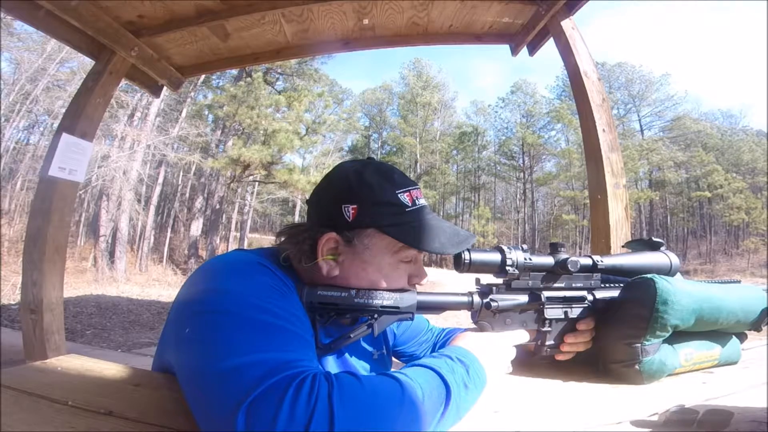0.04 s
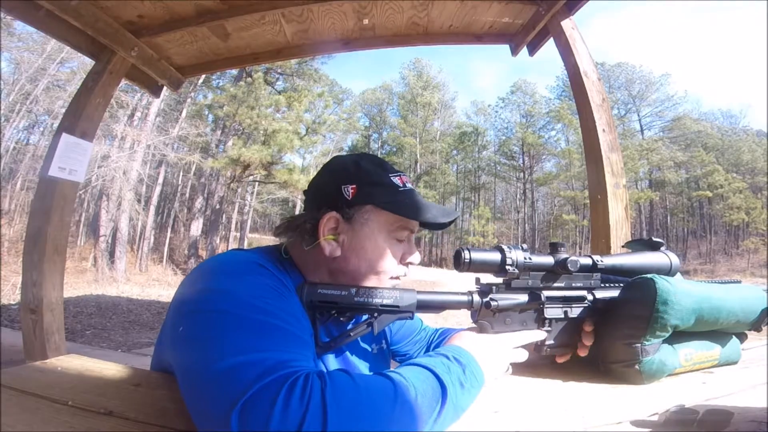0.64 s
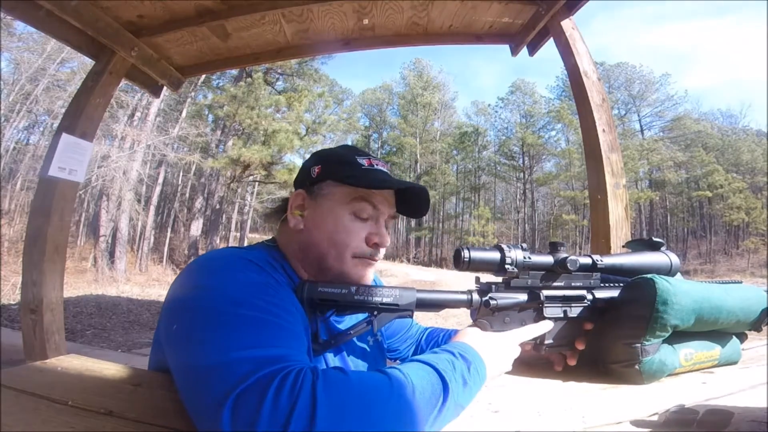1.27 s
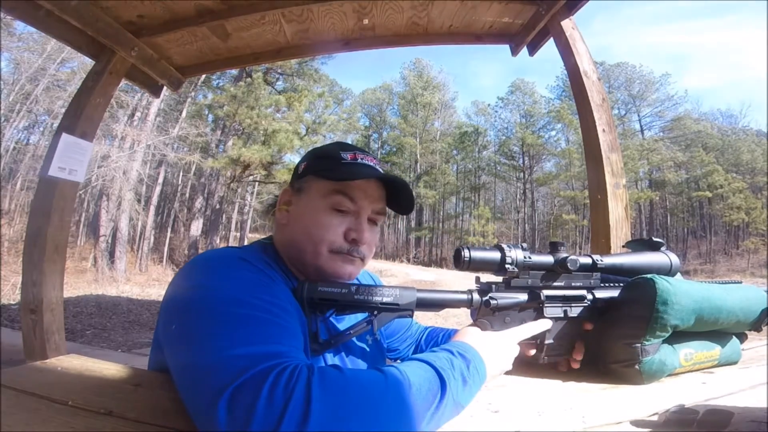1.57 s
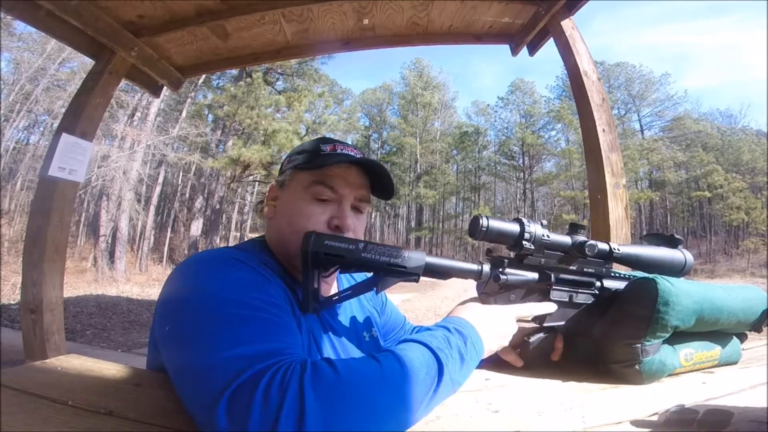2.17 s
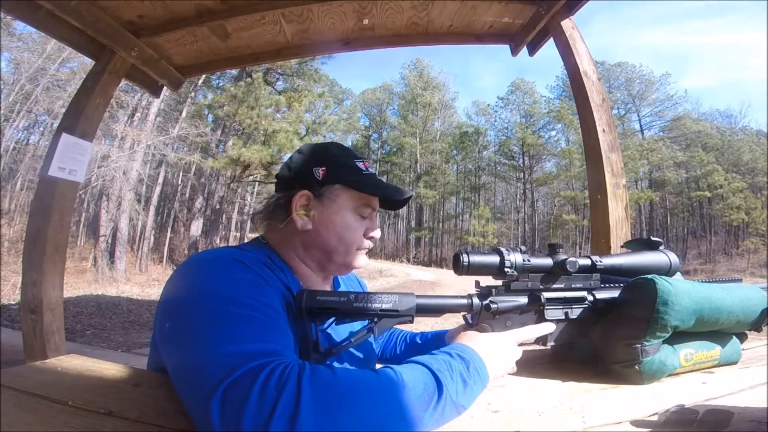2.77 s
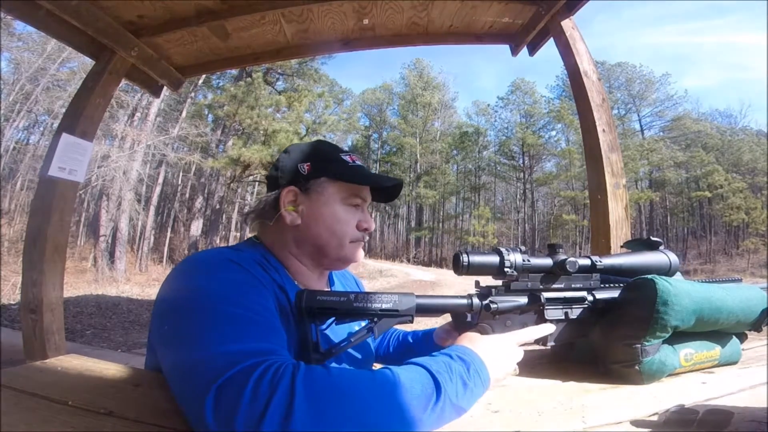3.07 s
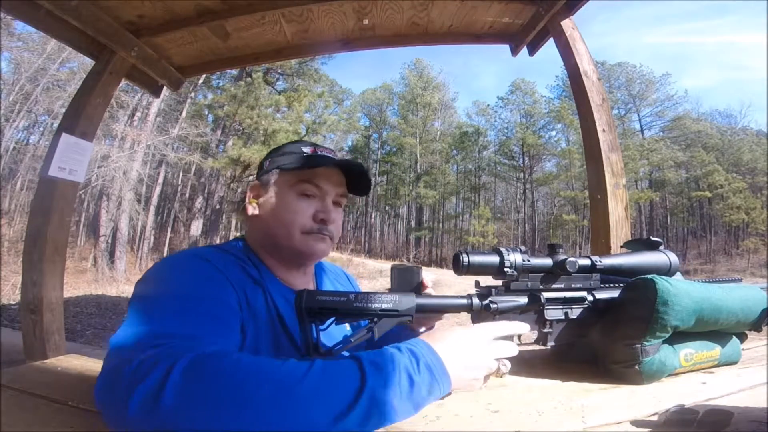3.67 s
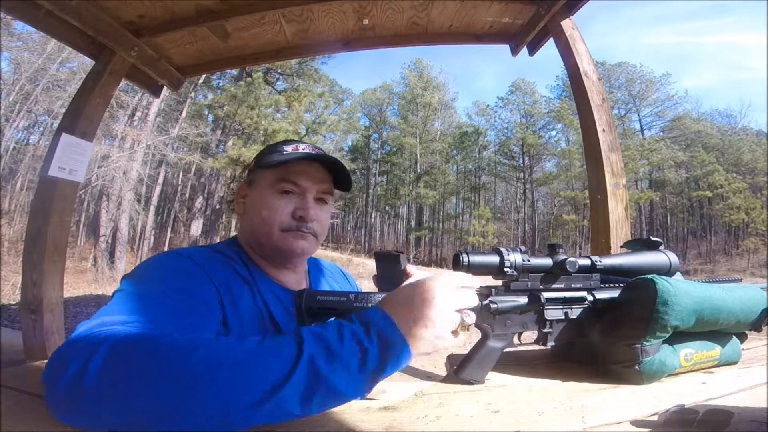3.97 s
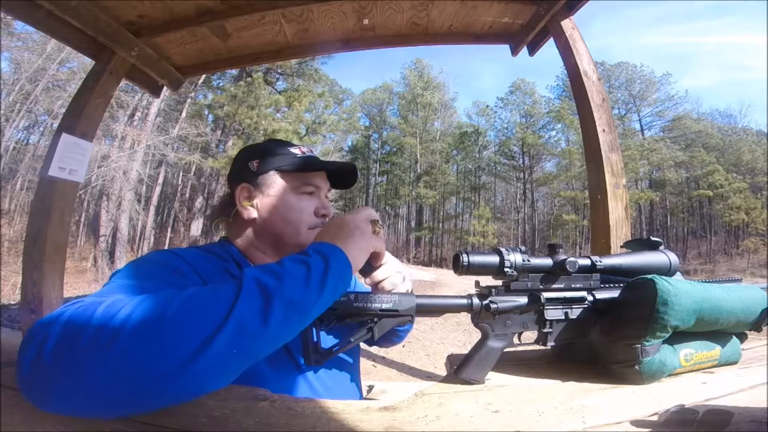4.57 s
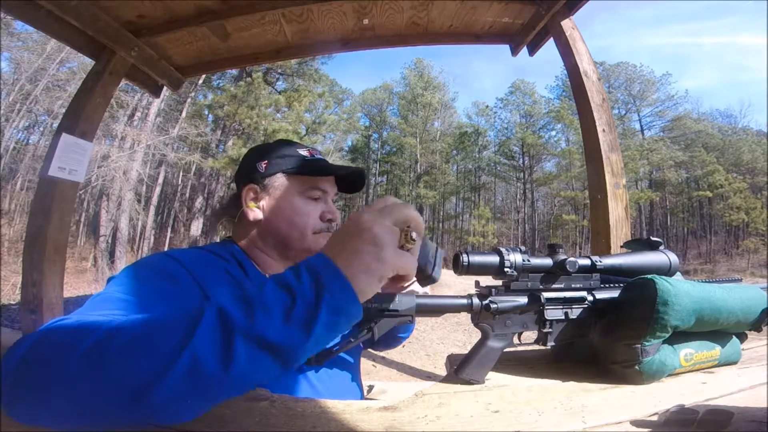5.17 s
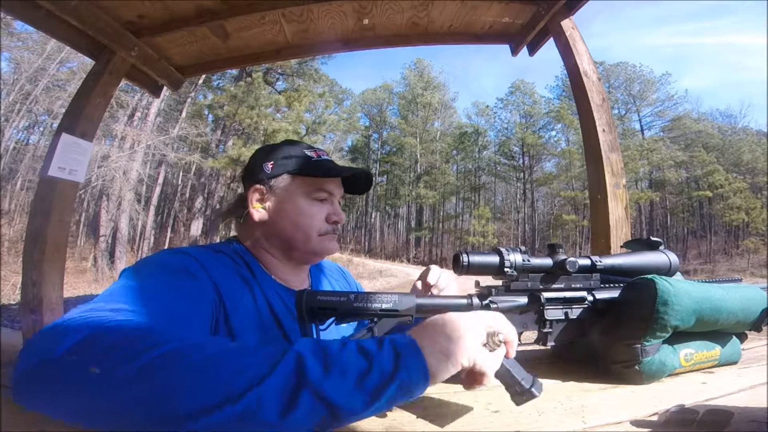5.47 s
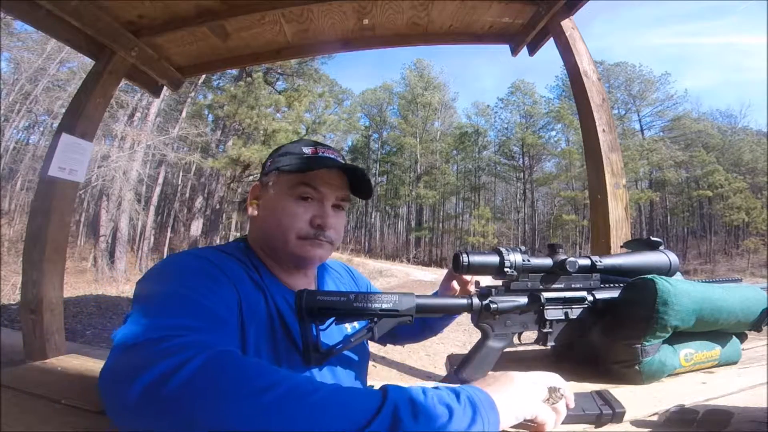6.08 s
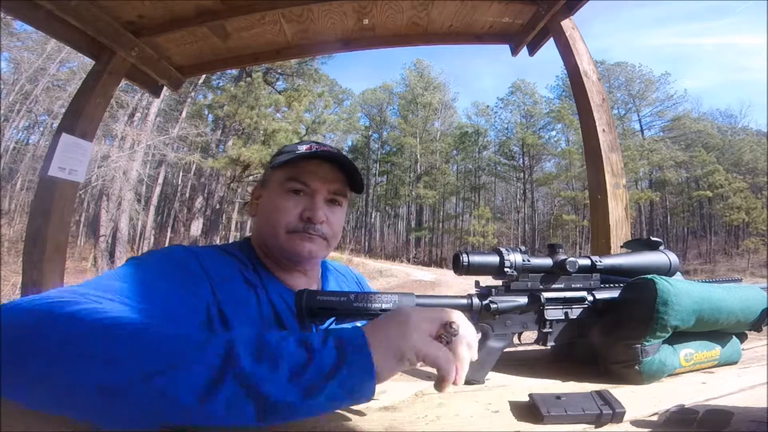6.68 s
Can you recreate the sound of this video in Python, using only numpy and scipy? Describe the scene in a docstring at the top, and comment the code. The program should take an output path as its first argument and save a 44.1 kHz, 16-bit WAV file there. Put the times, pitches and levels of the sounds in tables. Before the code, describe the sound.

A rifle is handled close to the microphone on a wooden bench under an open shelter. Its action gives a sharp metallic click, then it rattles briefly, slides on its bag with low knocks and settles with a heavy, dull thump. After a lull, a magazine is set down and tips over with a clack. A light breeze rumbles on the microphone over a faint hush of woods.

```python
"""A rifle is handled close by on a wooden shooting bench under an open shelter. Its action clicks, it slides on
its bag and settles with a dull thump; a magazine is set down and tips. Hard contacts ring the metal parts and
scatter in the shelter; blows and friction boom in the planks. A faint, narrow ping near 6.5 kHz sounds during
the brief chatter just after 2 s. A light breeze rumbles on the microphone, the woods hush and thin hisses,
likely cloth, come and go."""
import sys
import numpy as np
from scipy import signal
from scipy.fft import rfft, irfft, next_fast_len
from scipy.io import wavfile
from scipy.ndimage import map_coordinates

SR = 44100
rng = np.random.default_rng(int(sys.argv[2]) if len(sys.argv) > 2 else 0)


def unload_wav(signal):
    """Save mono or channel-first audio to the path in sys.argv[1] as 16-bit WAV at rate SR, clipped to [-1, 1]."""
    wavfile.write(
        sys.argv[1],
        SR,
        np.round(np.clip(np.atleast_2d(signal).T, -1, 1) * 32767).astype(np.int16),
    )


N = 305297

# unloaded bench modes (frame, top, then planks): pitch_hz, level_db, t60_s
BENCH_MODES = [(57.3, 1.5, 0.34), (105.2, 0.5, 0.28), (161.2, -7.5, 0.099), (225.8, -6, 0.22),
               (289.4, -2, 0.35), (307, -20, 0.11), (366, -15.5, 0.072)]


def amp(db):
    """Decibels to gain."""
    return 10 ** (np.asarray(db) / 20)


def unit(x):
    """Scale to rms 1."""
    return x / np.sqrt(np.mean(x ** 2) + 1e-20)


def along(points, hz):
    """Interpolate (hz, value) points on a log axis."""
    point_hz, values = np.transpose(points)
    return np.interp(np.log(hz + 1), np.log(point_hz + 1), values)


def filtered(x, response):
    """Apply a gain given as a function of hz."""
    size = next_fast_len(len(x) + 8192)
    return irfft(rfft(x, size) * response(np.fft.rfftfreq(size, 1 / SR)), size)[:len(x)]


def noise(spectrum, size):
    """Coloured noise of rms 1."""
    return unit(filtered(rng.standard_normal(size), lambda hz: amp(along(spectrum, hz))))


def wobble(rate_hz):
    """Smooth random curve with knots at rate_hz."""
    knots = rng.standard_normal(int(N * rate_hz / SR) + 4)
    return map_coordinates(knots, [np.arange(N) * rate_hz / SR])


def add(track, start_s, sound):
    """Mix a sound into the track."""
    part = track[round(start_s * SR):]
    part[:len(sound)] += sound[:len(part)]


def spot(hz, spot_hz, fall_db_per_oct):
    """Favour one band; the others fall away."""
    return amp(-fall_db_per_oct * np.abs(np.log2((hz + 1) / spot_hz)))


def breeze(calm_db=-52.5, gain_db=1):
    """Wind rumbles on the microphone; bell-shaped gusts add their power to the calm."""
    # gusts: peak_s, sigma_s, level_db
    gusts = [(0.65, 0.053, -36), (0.92, 0.055, -33.5), (1.35, 0.64, -43), (1.84, 0.11, -33),
             (2.19, 0.15, -28), (2.55, 0.7, -42), (3.01, 0.065, -31.5), (3.419, 0.1, -41),
             (6.28, 0.37, -49.5)]
    # rumble spectrum: freq_hz, density_db
    rumble = [(4, -20), (8, -7), (15, 0), (22, -8), (32, -21), (45, -18.5), (70, -28), (110, -28),
              (250, -50), (1500, -120)]
    t = np.arange(N) / SR
    gust_power = sum(amp(db) ** 2 * np.exp(-((t - peak_s) / sigma_s) ** 2)
                     for peak_s, sigma_s, db in gusts)
    return amp(gain_db) * np.sqrt(amp(calm_db) ** 2 + gust_power) * noise(rumble, N)


def woods(level_db=-52, drift_db=0.28):
    """Distant woods give a nearly even hush."""
    # hush spectrum: freq_hz, density_db
    hush = [(10, -7.5), (25, 3.5), (55, 4.5), (85, 0.5), (130, -4), (250, -8), (400, -12), (650, -16),
            (1000, -19.5), (2000, -24), (3000, -26.5), (5000, -31.5), (7000, -35.5), (10000, -41),
            (13000, -47), (14000, -56)]
    return amp(level_db + drift_db * wobble(rate_hz=2.77)) * noise(hush, N)


def hisses(flutter_db=2.5):
    """Narrow noise bands swell and flutter, some gliding: likely cloth rubbing on the rifle."""
    # rubs: start_s, length_s, centre_hz, half_width_hz, glide_hz_per_s, level_db
    rubs = [(0.2, 0.55, 2980, 120, 0, -77), (1.81, 0.07, 8000, 3000, 0, -72),
            (2.12, 0.42, 2880, 110, 200, -74.5), (2.48, 0.21, 2380, 130, 700, -70),
            (2.64, 0.24, 2420, 110, -300, -73.5), (2.48, 0.19, 6450, 170, -1200, -76),
            (4.52, 0.45, 2940, 120, 0, -74.5)]
    out = np.zeros(N)
    flutter = amp(flutter_db * wobble(rate_hz=39))
    for start_s, length_s, centre_hz, half_width_hz, glide_hz_per_s, level_db in rubs:
        swell = np.sqrt(np.abs(np.hanning(int(length_s * SR))))
        t = np.arange(len(swell)) / SR
        white = rng.standard_normal(len(t))
        band = filtered(white, lambda hz: 1 / (1 + ((hz - centre_hz) / half_width_hz) ** 2))
        glide = np.exp(1j * np.pi * glide_hz_per_s * (t - length_s / 2) ** 2)
        hiss = np.real(signal.hilbert(band) * glide)
        add(out, start_s, amp(level_db) * swell * unit(hiss))
    return out * flutter


def clicks(contacts, modes, ring_db, crack_db, crack_t60_s, attack_s):
    """Each click is a short crack plus ringing modes, coloured around its spot_hz."""
    # contact noise spectrum: freq_hz, density_db
    crack_spectrum = [(100, -21), (300, 2.5), (600, 6.5), (900, 1), (1200, 2), (1900, -8.5), (2800, 2.5),
                      (3400, -7), (5000, -15), (7000, -10), (10000, -24), (14000, -24)]
    out, t = np.zeros(N), np.arange(SR // 4) / SR
    hz, mode_db, t60_s = np.transpose(modes)[:, :, None]
    sign = (-1) ** np.arange(len(hz))[:, None]  # neighbouring modes start in opposite directions
    for start_s, level_db, spot_hz, fall_db_per_oct in contacts:
        scatter_db = rng.normal(0, 0.34, hz.shape)
        strength = sign * spot(hz, spot_hz, fall_db_per_oct) * amp(mode_db + scatter_db)
        ring = (strength * amp(-60 * t / t60_s) * np.sin(2 * np.pi * hz * t)).sum(0)
        crack = filtered(noise(crack_spectrum, len(t)), lambda f: spot(f, spot_hz, fall_db_per_oct))
        click = amp(ring_db) * ring + amp(crack_db - 60 * t / crack_t60_s) * crack
        add(out, start_s, amp(level_db) * click * (1 - np.exp(-t / attack_s)))
    return out


def rifle_and_ping():
    """Hard contacts and a brief chatter ring receiver and stock; a faint, narrow high ping joins."""
    # rifle contacts, and the ping at 2.054 s: start_s, level_db, spot_hz, fall_db_per_oct
    events = [(0.476, -39, 2910, 8.5), (1.63511, -32.5, 570, 3.5), (1.64133, -27.5, 4460, 0.8),
              (1.64437, -22, 720, 12), (1.6452, -23, 3300, 12), (1.65366, -36.5, 7070, 5.5),
              (1.65828, -40, 2800, 7.6), (1.67313, -41.5, 2690, 1), (1.862, -46, 4000, 4),
              (2.054, -43, 6550, 50), (2.0612, -29, 2200, 15.5), (2.062, -23, 457, 37),
              (2.068, -33, 1190, 30), (2.072, -38.5, 2380, 9.5)]
    # the ping at 6540 Hz, the rest receiver and stock: pitch_hz, level_db, t60_s
    modes = [(490, -8, 0.052), (567, -5.5, 0.036), (716, 0, 0.047), (880, -14, 0.07), (1116, -4, 0.063),
             (1254, -7, 0.029), (1520, -13.5, 0.03), (1870, -10, 0.031), (2220, -21, 0.022),
             (2436, -17, 0.038), (2824, -9.5, 0.028), (2920, -6.5, 0.027), (3580, -13, 0.028),
             (3980, -18, 0.032), (4610, -22.5, 0.057), (5370, -20, 0.02), (6110, -17, 0.02),
             (6540, -17, 0.035), (6970, -15, 0.02), (8760, -15.5, 0.015)]
    return clicks(events + chatter(), modes,
                  ring_db=-5, crack_db=-6, crack_t60_s=0.028, attack_s=0.00022)


def shelter(x, delay_s=0.0051, build_s=0.0068):
    """Bench top, posts and roof scatter a short tail."""
    # tail decay: freq_hz, t60_s
    decay = [(300, 0.1), (1000, 0.14), (3000, 0.13), (7000, 0.15), (14000, 0.11)]
    hz, t, spectra = signal.stft(rng.standard_normal(SR // 3), SR, nperseg=256)
    tail = signal.istft(spectra * amp(-60 * t / along(decay, hz)[:, None]), SR, nperseg=256)[1]
    tail *= np.clip((np.arange(len(tail)) / SR - delay_s) / build_s, 0, 1)
    return signal.fftconvolve(x, tail / np.linalg.norm(tail))[:N]


def friction(grip, modes, spot_hz, damping=3.64, cutoff_hz=367):
    """Soft, stuttering friction shakes bench modes damped by the weight on them; rms 1."""
    force = filtered(grip * rng.standard_normal(N),
                     lambda f: spot(f, spot_hz, fall_db_per_oct=9) / (1 + (f / cutoff_hz) ** 8))
    body = lambda f: sum(amp(db) / (1 + 1j * (f * f - hz * hz) * t60_s / (damping * (f + 1)))
                         for hz, db, t60_s in modes)
    return unit(filtered(force, body))


def slides(attack_s=0.036, release_s=0.058, rough_db=3, top_gain_db=1):
    """Sleeve, rifle and magazine slide with uneven grip, shaking the bench top and planks."""
    # strokes: start_s, length_s, top_db, plank_db, plank_growth_db_per_s, spot_hz
    strokes = [(0.59, 0.13, -50.5, -72, -4.5, 171), (0.863, 0.12, -49, -51.5, -60, 170),
               (1.85, 0.31, -51, -61.5, 0, 173), (2.159, 0.233, -35, -43.5, 6, 288),
               (2.465, 0.25, -59, -46.5, -75, 175), (5.9, 0.15, -48, -48, 40, 257),
               (6.054, 0.13, -45.5, -42, 20, 276)]
    out, t = np.zeros(N), np.arange(N) / SR
    grip = amp(rough_db * wobble(rate_hz=45))
    top = amp(top_gain_db) * friction(grip, BENCH_MODES[1:2], spot_hz=97)
    for start_s, length_s, top_db, plank_db, plank_growth_db_per_s, spot_hz in strokes:
        age_s = np.clip(t - start_s, 0, length_s)
        contact = np.minimum(age_s / attack_s, (length_s - age_s) / release_s).clip(max=1)
        planks = friction(grip, BENCH_MODES[2:], spot_hz)
        plank_gain = amp(plank_db + plank_growth_db_per_s * (age_s - length_s / 2))
        out += contact * (amp(top_db) * top + plank_gain * planks)
    return out


def knocks(choke_t60_s=0.16):
    """Soft, heavy blows swell frame, top and plank modes until the load settles and chokes them."""
    # blows on the loaded bench: start_s, frame_db, top_db, plank_db, push_s, pitch_ratio, t60_ratio
    blows = [(0.88, -54, -46, -54, 0.0097, 1, 0.62), (1.667, -51, -31.5, -53, 0.02, 0.9, 0.72),
             (2.056, -31, -39, -41.5, 0.01, 1.29, 0.9), (2.075, -54, -41, -31, 0.011, 0.98, 0.57),
             (2.084, -37, -20, -42, 0.026, 0.98, 0.61), (2.157, -43, -33, -51, 0.015, 1.02, 0.67),
             (2.2, -49, -53, -54, 0.011, 0.98, 0.34), (2.224, -52, -33, -42, 0.0072, 1, 0.64),
             (2.270, -45, -39, -35.5, 0.0029, 1, 0.6), (2.324, -38, -27, -54, 0.016, 0.99, 0.88),
             (2.492, -54, -51, -39.5, 0.015, 0.69, 0.98), (2.8584, -30, -26.5, -43.5, 0.037, 1.05, 1),
             (2.8867, -13.5, -20, -42, 0.0094, 0.99, 0.94), (2.9059, -27.5, -15, -40.5, 0.014, 0.99, 0.86),
             (5.739, -58, -35.5, -30.5, 0.0063, 1, 0.94), (5.7831, -43, -34, -44, 0.005, 1.04, 1),
             (6.143, -41, -35.5, -31.5, 0.0075, 1, 1), (6.1646, -47, -35.5, -29, 0.0055, 1.04, 1)]
    # rifle or magazine comes to rest: time_s
    settles_s = [3.02, 5.82, 6.222]
    out, t = np.zeros(N), np.arange(SR // 2) / SR
    hz, mode_db, t60_s = np.transpose(BENCH_MODES)[:, :, None]
    for start_s, frame_db, top_db, plank_db, push_s, pitch_ratio, t60_ratio in blows:
        strength = amp(mode_db + along([(60, frame_db), (105, top_db), (240, plank_db)], hz))
        swell = np.sin(np.pi / 2 * np.minimum(t / push_s, 1)) ** 2
        fade = amp(-60 * np.maximum(t - push_s, 0) / (t60_ratio * t60_s))
        boom = (strength * fade * np.sin(2 * np.pi * pitch_ratio * hz * t)).sum(0)
        rest_s = min(s for s in settles_s if s > start_s)
        choke = amp(-60 * np.maximum(start_s + t - rest_s, 0) / choke_t60_s)
        add(out, start_s, choke * swell * boom)
    return out


def chatter(start_s=2.04, end_s=2.08, jitter_s=0.001, count=10):
    """Contact rows for the rifle lifting off its rest: a quick, uneven run that grows stronger."""
    times_s = np.linspace(start_s, end_s, count) + rng.normal(0, jitter_s, count)
    levels_db = np.linspace(-41, -37, count)
    spot_hz, fall_db_per_oct = 1420, 8
    return [(s, db, spot_hz, fall_db_per_oct) for s, db in zip(times_s, levels_db)]


def magazine():
    """The magazine's shell rings as it is set down and tips over."""
    # contacts with the bench: start_s, level_db, spot_hz, fall_db_per_oct
    contacts = [(5.497, -45, 3500, 17), (5.7246, -25.5, 496, 27), (5.7285, -40, 2950, 26),
                (5.737, -46, 2900, 20), (6.087, -42, 2550, 25), (6.095, -39, 2550, 28),
                (6.13686, -23.5, 1280, 8), (6.1393, -26, 4460, 5), (6.14313, -35, 2270, 15),
                (6.14881, -29, 980, 6.5), (6.15457, -31, 2630, 15), (6.16409, -40.5, 2690, 9.6),
                (6.16612, -34.5, 1020, 15)]
    # shell modes: pitch_hz, level_db, t60_s
    modes = [(519, -12, 0.045), (718, -8, 0.063), (892, -7, 0.076), (1054, -12, 0.05), (1140, -4, 0.026),
             (1316, -3.5, 0.033), (1660, -13, 0.042), (2020, -17, 0.02), (2220, -6, 0.03),
             (2556, -7.5, 0.036), (2650, -2, 0.023), (2900, -11, 0.024), (3620, -8, 0.024),
             (3930, -8, 0.021), (4590, -13.5, 0.022), (5670, -11, 0.021), (6400, -5, 0.018),
             (6870, -11, 0.017), (9000, -13, 0.021)]
    return clicks(contacts, modes, ring_db=-6.5, crack_db=-3.5, crack_t60_s=0.021, attack_s=0.00018)


def scene():
    """Mono mix: clicks with their shelter tail, bench booms and background."""
    hard = rifle_and_ping() + magazine()
    bench = slides() + knocks()
    background = hisses() + breeze() + woods()
    return (hard + amp(-10.5) * shelter(hard) + bench + background)[None]


def record(dry):
    """Brick-wall low-pass."""
    cutoff_hz = 14200
    return np.array([filtered(channel, lambda hz: hz < cutoff_hz) for channel in dry])


dry = scene()
out = record(dry)
unload_wav(out)
```